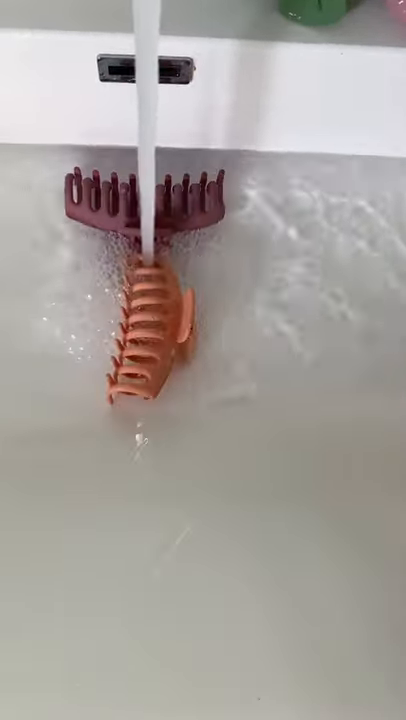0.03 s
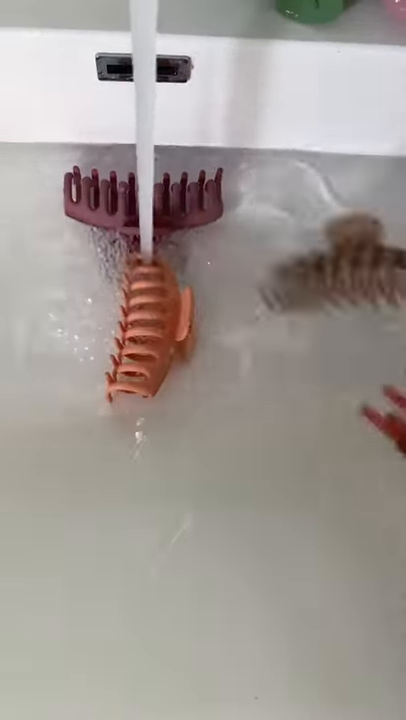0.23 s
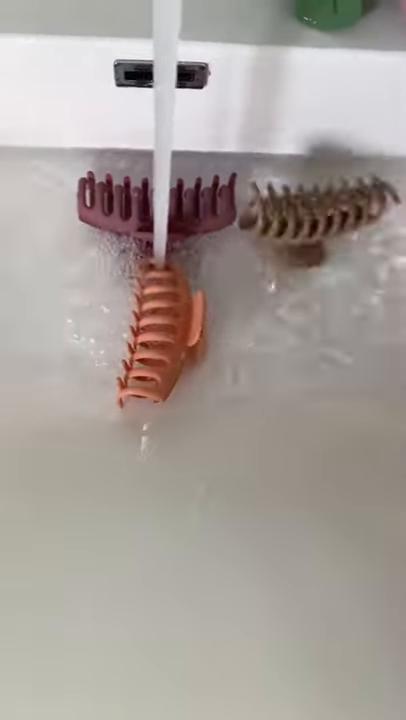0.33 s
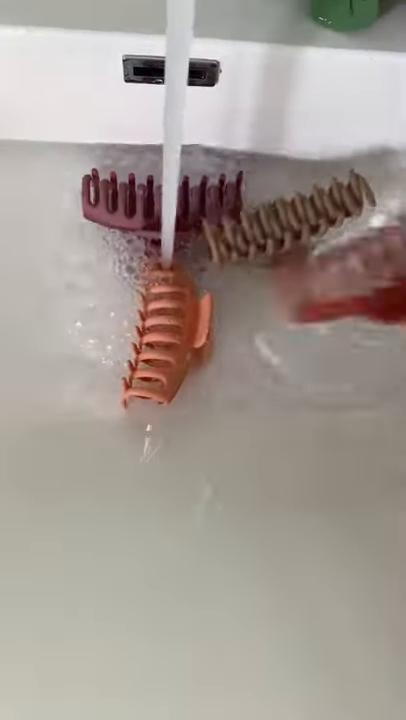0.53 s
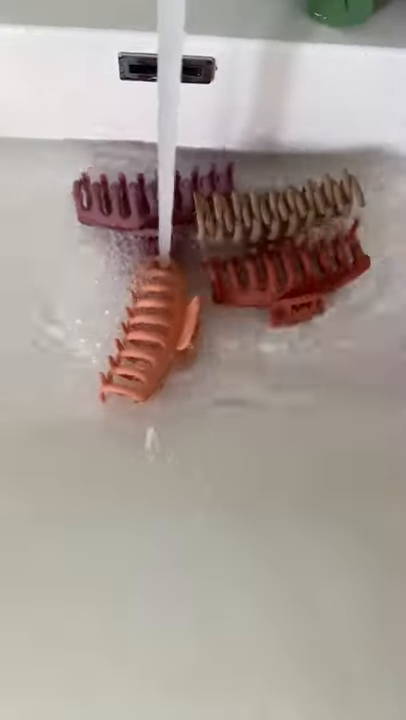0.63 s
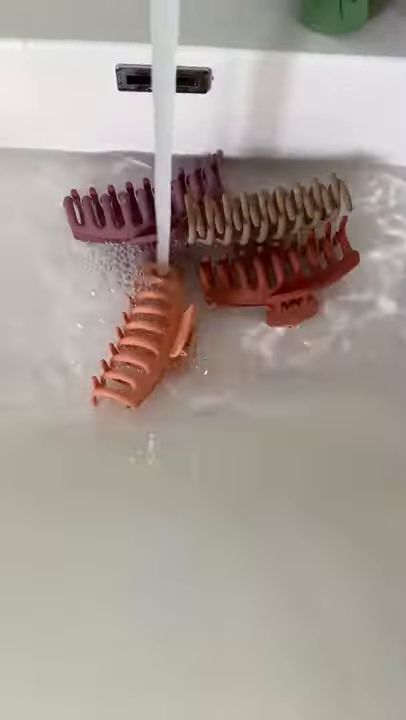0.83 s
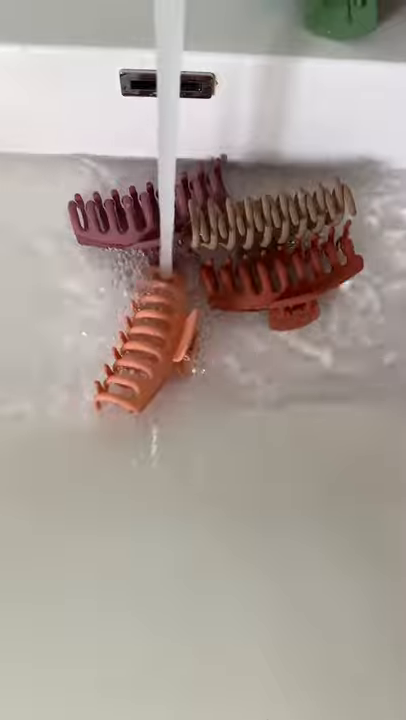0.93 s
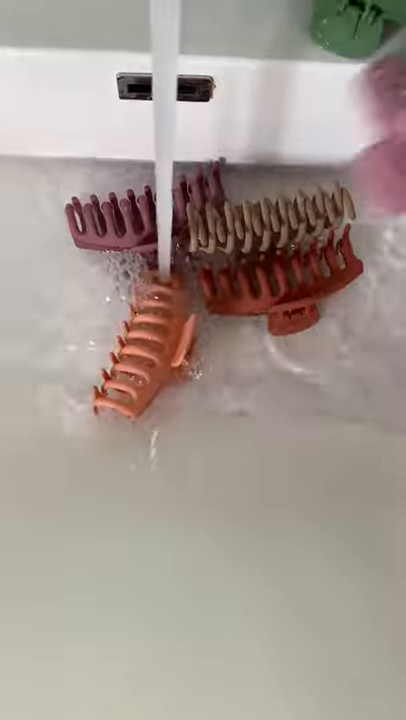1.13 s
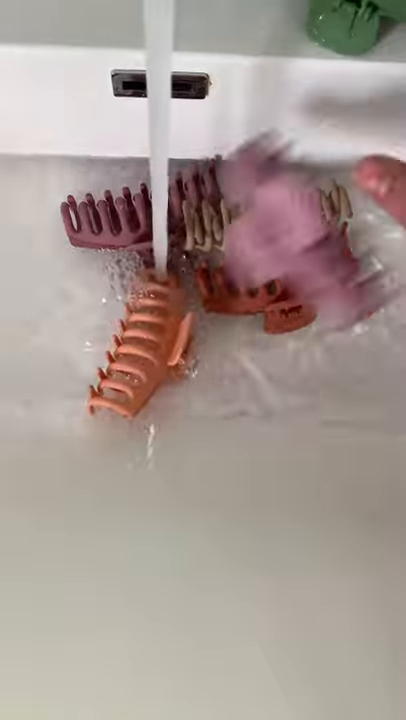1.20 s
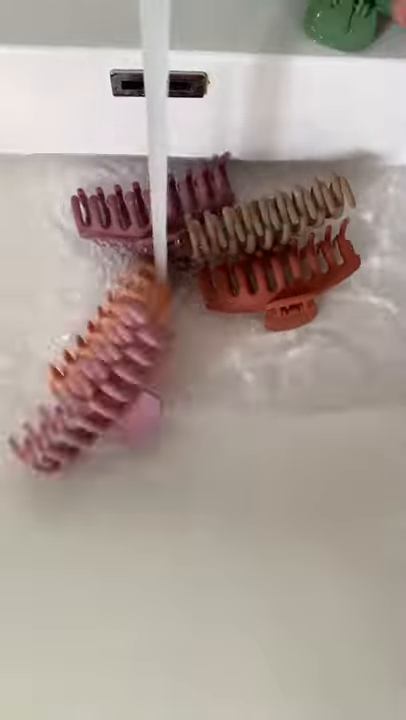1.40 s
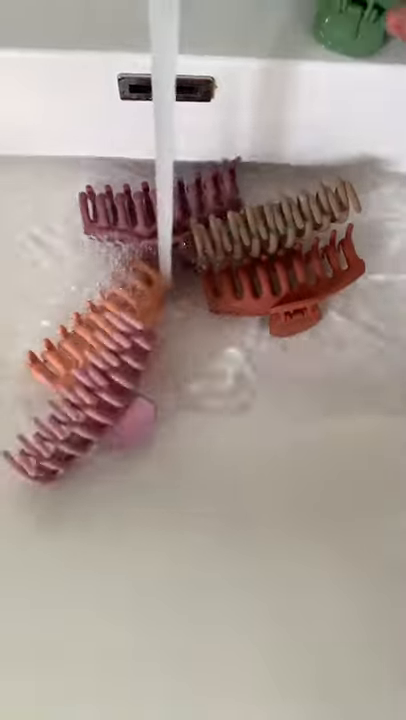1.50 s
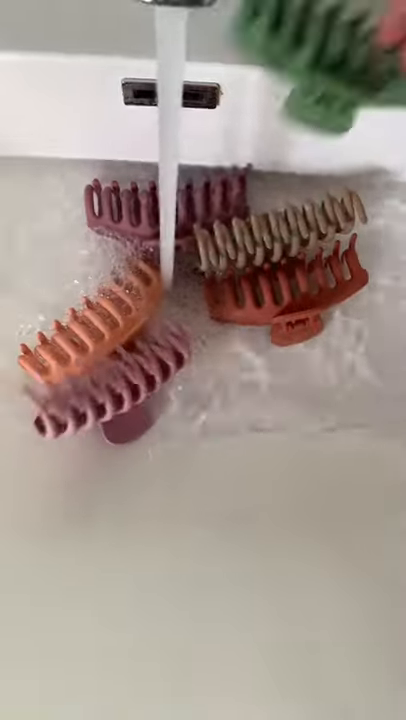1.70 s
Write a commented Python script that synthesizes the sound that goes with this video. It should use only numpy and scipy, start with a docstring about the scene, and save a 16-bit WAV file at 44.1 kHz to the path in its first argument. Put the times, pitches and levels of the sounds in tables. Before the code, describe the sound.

Plastic hair clips are tossed into a basin under steadily running tap water, clacking against each other and the sides with soft booms and plops. Water sloshes and drips after the last one, close by in a small echoing room.

```python
"""A tap runs into a shallow-filled basin in a small hard room, hissing and spattering throughout.
From 0.2 s plastic hair clips are tossed in: each clatters against the others and the basin wall,
the combs ring, the basin booms softly and trapped air plops.
Near 1.4 s the last clip tumbles off and plops under; the water sloshes,
splashed drops fall back with sharp ticks and a low thump, and the room rings on."""
import sys
import numpy as np
from scipy import signal
from scipy.fft import rfft, irfft
from scipy.io import wavfile
from scipy.ndimage import uniform_filter1d

SR = 44100
rng = np.random.default_rng(int(sys.argv[2]) if len(sys.argv) > 2 else 0)


def put_to_file(sound):
    """Save the sound as 16-bit audio at rate SR, in the file named by the first command-line argument."""
    columns = np.atleast_2d(sound).T  # one column per channel
    safe = np.clip(columns, -1, 1)
    whole_steps = np.round(safe * 32767)
    wavfile.write(sys.argv[1], SR, whole_steps.astype(np.int16))


N = 77175


def amp(db):
    """Decibels to gain."""
    return 10 ** (np.asarray(db) / 20)


def unit_rms(x):
    """Scales to rms 1."""
    return x / np.sqrt(np.mean(x ** 2) + 1e-20)


def curve_at(points, hz):
    """Interpolates a table on a log-frequency axis."""
    points_hz, values = np.transpose(points)
    return np.interp(np.log(hz + 1), np.log(points_hz + 1), values)


def add(mix, time_s, sound):
    """Mixes a sound in at time_s."""
    part = mix[max(round(time_s * SR), 0):][:len(sound)]
    part += sound[:len(part)]


def convolve(x, response):
    """Passes x through an impulse response."""
    return signal.fftconvolve(x, response)[:N]


def minimum_phase(gain):
    """The shortest pulse with this magnitude spectrum."""
    log_gain = np.log(np.maximum(gain, gain.max() * 1e-4))
    mirrored = np.concatenate([log_gain, log_gain[-2:0:-1]])
    return np.fft.ifft(np.exp(np.conj(signal.hilbert(mirrored)))).real


# room decay: (frequency [Hz], t60 [s])
ROOM_DECAY = [(200, 0.59), (530, 0.44), (1400, 0.37), (3700, 0.35), (9700, 0.4), (16000, 0.62)]
# echo spectrum: (frequency [Hz], level re direct sound [dB])
ROOM_SPECTRUM = [(100, -9), (400, -2.5), (1000, 2.5), (2500, 0.5), (5000, -2), (9000, -4.5), (15000, -13)]


def room(x, onset_s=0.0044):
    """Dense echoes off hard walls."""
    hz, t, noise = signal.stft(rng.standard_normal(SR), SR, nperseg=256)
    t60_s = curve_at(ROOM_DECAY, hz)[:, None]
    envelope = amp(curve_at(ROOM_SPECTRUM, hz)[:, None] - 60 * t / t60_s)
    energy_norm = np.sqrt(2 * np.log(1000) / (t60_s * SR))
    tail = signal.istft(noise * envelope * energy_norm, SR, nperseg=256)[1][:SR]
    onset = np.minimum(np.arange(SR) / SR / onset_s, 1) ** 2
    return convolve(x, tail * onset)


# jet hitting the water: (frequency [Hz], relative spectral density [dB])
STREAM_SPECTRUM = [(20, -7), (55, 1), (95, 0), (137, 5.5), (175, -27), (215, -3), (300, -7), (430, 1),
                   (560, -4.5), (720, -6), (1000, -4), (1600, -5), (2600, -4), (4000, -9), (6000, -7),
                   (9000, -5), (12500, -9.5), (16000, -15)]


def stream(level_db=-51, patch_db=1.2, flicker_db=0.5):
    """The steady rush of the jet, in drifting patches with a common flicker."""
    size, hop = 1024, 256
    frames, hz = N // hop + 5, np.fft.rfftfreq(size, 1 / SR)
    real, imag, patches = rng.standard_normal((3, frames, len(hz)))
    patches = uniform_filter1d(patches, size=8, axis=0)
    patches = unit_rms(uniform_filter1d(patches, size=14, axis=1))
    flicker = unit_rms(uniform_filter1d(rng.standard_normal(frames), size=4))[:, None]
    gain = amp(curve_at(STREAM_SPECTRUM, hz) + patch_db * patches + flicker_db * flicker)
    spectra = (real + 1j * imag) * gain
    rush = signal.istft(spectra.T, nperseg=size, noverlap=size - hop)[1][:N]
    return amp(level_db) * unit_rms(rush)


def bubbles(rate_per_s, range_hz, spread_db, decay_cycles, glide, pitches=30):
    """Random tiny bubbles, each a short rising ping."""
    t, out = np.arange(SR // 10) / SR, np.zeros(N)
    for hz in np.geomspace(*range_hz, pitches) * rng.uniform(0.98, 1.04, pitches):
        age = t * hz / decay_cycles
        ping = np.exp(-age) * np.sin(2 * np.pi * hz * t * (1 + glide * np.minimum(age, 5)))
        strengths = amp(spread_db * np.minimum(rng.exponential(1, N), 4))
        births = rng.random(N) < rate_per_s / pitches / SR
        out += convolve(strengths * births, ping)
    return unit_rms(out)


# water stirred by landings: (time [s], level [dB])
SLOSH_SWELLS = [(.27, -60), (.62, -52), (1.41, -37.5)]


def slosh(rise_s=0.11, t60_s=0.81):
    """Low gurgling that wells up after a landing and settles."""
    t, swell = np.arange(N) / SR, np.zeros(N)
    for time_s, db in SLOSH_SWELLS:
        add(swell, time_s, amp(db - 60 * t / t60_s) * np.minimum(t / rise_s, 1))
    return swell * bubbles(450, (303, 2315), spread_db=-0.5, decay_cycles=4.8, glide=0.011)


# splashed drops falling back: (time [s], frequency [Hz], level [dB])
FALLING_DROPS = [(0.808, 5760, -40), (.924, 5960, -53), (.995, 5500, -36), (1.556, 4720, -36),
                 (1.582, 4550, -34.5), (1.63, 5550, -37), (1.707, 5280, -36.5), (1.739, 7650, -35.5)]


def drips(rise_s=0.00058, t60_s=0.012, glide_per_s=2.7):
    """Each falling drop traps a tiny bubble that pings upward."""
    t, out = np.arange(SR // 10) / SR, np.zeros(N)
    for time_s, hz, db in FALLING_DROPS:
        envelope = amp(db - 60 * t / t60_s) * np.minimum(t / rise_s, 1)
        add(out, time_s, envelope * np.sin(2 * np.pi * hz * t * (1 + glide_per_s * t / 2)))
    return out


# low thumps; clips striking, then a splashed drop near the end: (time [s], level [dB])
THUMPS = [(.233, -46.5), (0.263, -65), (0.592, -53), (1.056, -61), (1.273, -48), (1.408, -50), (1.66, -53)]
# low basin modes: (frequency [Hz], relative level [dB], t60 [s])
BASIN_LOW_MODES = [(52.8, -7, 0.88), (98, -0.5, 0.32), (136.3, 5.5, 0.37)]


def booms(rise_s=0.0027):
    """Each thump dies away in the basin's low modes."""
    t, out = np.arange(SR) / SR, np.zeros(N)
    for time_s, level_db in THUMPS:
        tone = sum(amp(db - 60 * t / t60_s) * np.sin(2 * np.pi * (hz * t + rng.random()))
                   for hz, db, t60_s in BASIN_LOW_MODES)
        add(out, time_s, amp(level_db) * np.minimum(t / rise_s, 1) * tone)
    return out


# air closed in as a clip goes under: (time [s], frequency [Hz], level [dB], t60 [s])
AIR_POCKETS = [(.2645, 856, -20.5, 0.048), (.627, 722, -36.5, .22), (0.623, 460.5, -35.5, 0.17),
               (1.281, 549, -37, 0.19), (1.32, 647, -34.5, 0.1), (1.407, 308, -26.5, .09),
               (1.41, 250, -33, 0.13), (1.408, 337.4, -31, 0.15), (1.412, 415.5, -30, 0.1),
               (1.45, 490, -38, 0.1), (1.454, 335, -35, .08), (1.551, 332, -37, .09),
               (1.556, 440, -39, 0.076), (1.569, 277.6, -39.5, 0.1), (1.592, 253, -41, 0.14),
               (1.628, 445, -40, 0.055)]


def plops(rise_cycles=1.8, glide_per_s=0.072):
    """Large air pockets ring and rise a little in pitch."""
    t, out = np.arange(SR // 2) / SR, np.zeros(N)
    for time_s, hz, db, t60_s in AIR_POCKETS:
        envelope = amp(db - 60 * t / t60_s) * np.minimum(t * hz / rise_cycles, 1)
        add(out, time_s, envelope * np.sin(2 * np.pi * hz * t * (1 + glide_per_s * t / 2)))
    return out


def ring(blows, modes):
    """Blows excite damped modes; each mode's level sets its energy."""
    t, response = np.arange(SR) / SR, np.zeros(SR)
    for hz, db, t60_s in modes:
        tone = amp(-60 * t / t60_s) * np.sin(2 * np.pi * hz * t)
        response += amp(db) * tone / np.linalg.norm(tone)
    return convolve(blows, response)


# thud, knock, clack, snap, tick: (low edge [Hz], high edge [Hz], t60 [s], trim [dB])
IMPACT_BANDS = [(270, 584, 0.054, -2), (648, 1520, 0.051, -1.5), (1610, 2490, 0.12, 0),
                (3020, 9330, 0.066, 0.5), (6340, 27500, 0.096, 0.5)]


def impact(levels_db, ring_hz, ring_db, ring_q=13, ring_t60_s=0.022,
           blow_s=0.0067, rise_cycles=0.89, roughness=0.66, rolloff_hz=9860):
    """One sharp hit: a grainy burst, and a plain blow that sets things ringing."""
    size = 8192
    t, hz = np.arange(size) / SR, np.fft.rfftfreq(size, 1 / SR) + 1
    parts = []
    for db, (low_hz, high_hz, t60_s, trim_db) in zip(levels_db, IMPACT_BANDS):
        loss = (1 + (low_hz / hz) ** 10) * (1 + (hz / high_hz) ** 10) * (1 + (hz / rolloff_hz) ** 6)
        parts.append((db + trim_db, np.sqrt(low_hz * high_hz), t60_s, loss ** -0.5))
    resonance = 1 / (1 + (ring_q * (hz / ring_hz - ring_hz / hz)) ** 2 / 2)
    parts.append((ring_db, ring_hz, ring_t60_s, resonance))
    out, power = np.zeros(size), 0
    for db, centre_hz, t60_s, band in parts:
        strength = amp(db) * np.sqrt(blow_s * SR)
        grains = rng.standard_normal(size) * np.exp(roughness * rng.standard_normal(size))
        envelope = amp(-60 * t / t60_s) * np.minimum(t * centre_hz / rise_cycles, 1)
        burst = irfft(rfft(grains) * band) * envelope
        out += strength * burst / np.linalg.norm(burst)
        power += (strength * unit_rms(band)) ** 2
    return out, minimum_phase(np.sqrt(power))


# sharp ticks; clips striking, then splashed drops falling back near the end:
# (time [s], thud [dB], knock [dB], clack [dB], snap [dB], tick [dB], resonance [Hz], its level [dB])
IMPACTS = [(.002, -72, -70, -75, -46, -40.5, 7660, -43), (.018, -63, -70, -61.5, -49, -50, 7900, -49),
           (0.2327, -46.5, -37.5, -33.5, -30.5, -25.5, 4680, -30),
           (0.2351, -56, -60, -46, -36, -40, 3000, -32.5),
           (0.2651, -37.5, -31.5, -35.5, -34.5, -35, 2680, -33.5),
           (0.27, -42, -50, -39, -35, -32.5, 2300, -36), (0.3182, -50, -41, -36.5, -33.5, -32.5, 3720, -37),
           (.354, -50, -52, -48, -63, -42.5, 1190, -44), (.474, -52.5, -45, -83, -85, -82, 1099, -66),
           (.4935, -50.5, -45, -50, -48.5, -47.5, 1960, -47),
           (0.5928, -44.5, -42, -37.5, -36, -26.5, 4500, -38),
           (0.5986, -41, -39.5, -56, -34, -33, 4830, -38), (0.603, -53, -37, -61, -29, -36, 6600, -37),
           (.617, -34.5, -33, -33.5, -28.5, -32.5, 3480, -32.5),
           (.629, -45, -55, -44, -34.5, -30.5, 4050, -34.5), (.668, -69, -38, -42.5, -43, -63, 1480, -39),
           (.847, -90, -58, -61, -54, -56, 5900, -51.5), (0.8986, -67, -58, -65, -66, -47.5, 6850, -53),
           (0.9337, -77, -81, -56, -51, -45, 6700, -49), (1.0548, -60, -64, -50, -39, -35, 7200, -53),
           (1.1165, -63, -57, -60, -50, -45, 5440, -50), (1.2489, -52, -72, -75, -47, -43.5, 7900, -63),
           (1.2739, -43, -34, -38.5, -33, -32.5, 5450, -36.5),
           (1.281, -39.5, -42, -56, -43, -40, 1710, -41), (1.319, -55, -34, -42, -58, -47, 3940, -39.5),
           (1.3767, -42, -39, -43, -59.5, -43.5, 5000, -44),
           (1.406, -31.5, -36, -39, -38, -40, 5460, -35.5),
           (1.4125, -31, -31, -37.5, -35.5, -33.5, 7100, -44),
           (1.457, -43, -45, -49, -44, -46, 1950, -41.5), (1.5249, -45, -54, -51.5, -50, -52, 1940, -59),
           (1.5546, -45, -49, -56, -46.5, -56, 8560, -44), (1.6602, -64, -61, -57, -54, -46, 5080, -46.5)]
# plastic combs: (frequency [Hz], relative level [dB], t60 [s])
COMB_MODES = [(1692, -25.5, 0.36), (2890, -26, 0.33), (3554, -18.5, 0.11), (4210, -36, 0.06),
              (4450, -34, .1), (5270, -23, 0.29), (6980, -36, .12), (8070, -37, 0.16)]
# basin and the air in it: (frequency [Hz], relative level [dB], t60 [s])
BASIN_MODES = [(251, -19, 0.51), (304, -13, 0.48), (347, -18.5, .55), (406, -17.5, 0.19),
               (458.7, -13, 0.44), (492, -19.5, 0.2), (560.5, -18.5, 0.74), (727.6, -12, 0.5),
               (950, -33, 0.18), (981, -15.5, 0.19), (1069, -14.5, 0.49)]


def clatter(basin_db=-9):
    """Clips, then late drops, strike; each hit rings the combs and basin and has its own echoes."""
    out, blows = np.zeros((2, N))
    for time_s, *levels_db, ring_hz, ring_db in IMPACTS:
        burst, blow = impact(levels_db, ring_hz, ring_db)
        add(out, time_s, burst)
        add(out, time_s, room(blow))
        add(blows, time_s, blow)
    return out + ring(blows, COMB_MODES) + amp(basin_db) * ring(blows, BASIN_MODES)


# jet splash, a little harder as the clips pile up: (time [s], gain [dB])
SPLASH_GAIN = [(0, 1.5), (.17, -1.1), (.55, -0.6), (.85, 0.5), (1.2, 0.5), (1.75, 1.9)]


def scene(spray_db=-60.5, burble_db=-61.5, plop_room_db=-6):
    """Running water and clips in the room."""
    splash = amp(np.interp(np.arange(N) / SR, *np.transpose(SPLASH_GAIN)))
    spray = amp(spray_db) * bubbles(720, (3230, 10640), spread_db=2.5, decay_cycles=4.5, glide=0.0038)
    burble = amp(burble_db) * bubbles(90, (427.3, 2820), spread_db=-1.5, decay_cycles=15, glide=0.015)
    water = splash * (spray + burble) + drips() + slosh()
    plunge = plops()
    hits = clatter()
    water_echoes = room(water + amp(plop_room_db) * plunge)
    return (hits + water + plunge + water_echoes + booms() + splash * stream())[None]


# bands that cancel at the listening spot: (centre [Hz], width [Hz], gain [dB])
NOTCHES = [(203, 32, -4), (605, 43, -6.5), (1464, 120, -3.5)]


def record(dry, cutoff_hz=15900):
    """The colour of the listening spot, then a steep low-pass."""
    hz = np.fft.rfftfreq(8192, 1 / SR)
    gain_db = sum(db / (1 + (2 * (hz - centre_hz) / width_hz) ** 2)
                  for centre_hz, width_hz, db in NOTCHES)
    coloured = convolve(dry[0], minimum_phase(amp(gain_db)))
    lowpass = signal.firwin(255, cutoff_hz, window=("kaiser", 9), fs=SR)
    return signal.oaconvolve(coloured, lowpass, "same")[None]


dry = scene()
out = record(dry)
put_to_file(out)
```